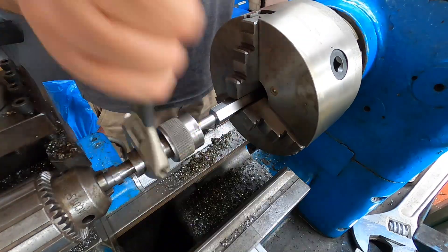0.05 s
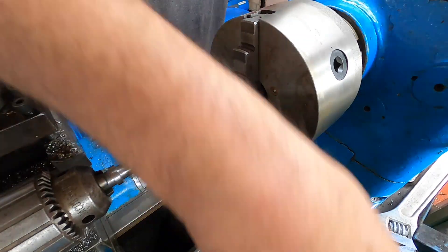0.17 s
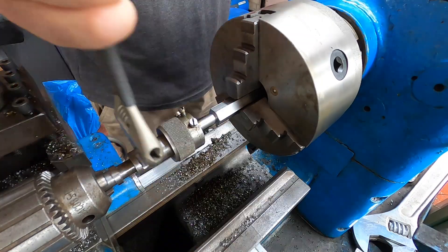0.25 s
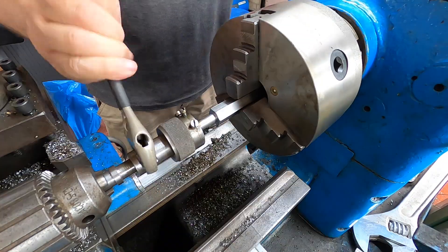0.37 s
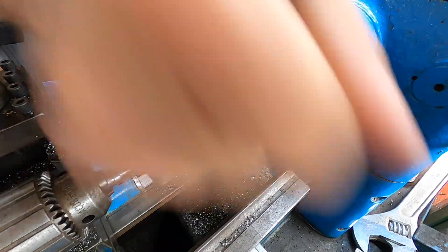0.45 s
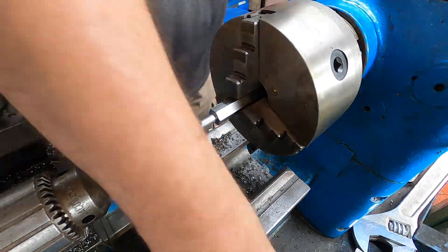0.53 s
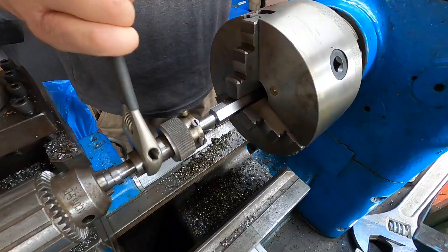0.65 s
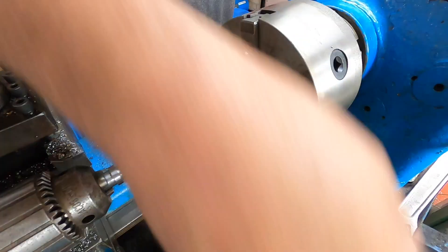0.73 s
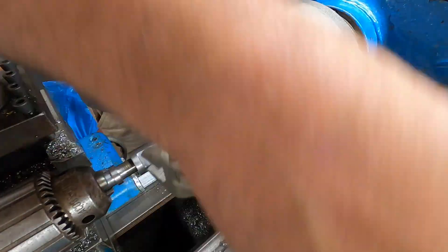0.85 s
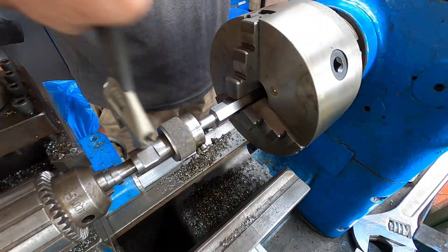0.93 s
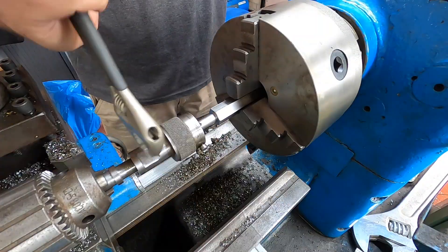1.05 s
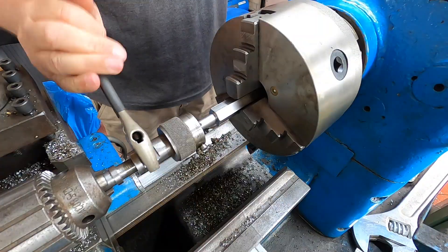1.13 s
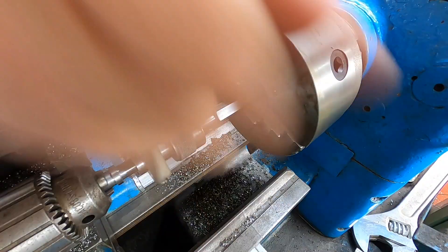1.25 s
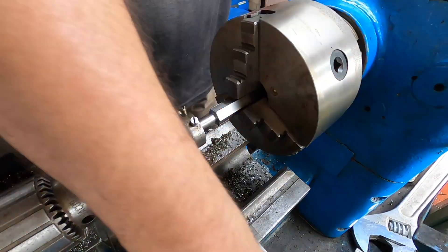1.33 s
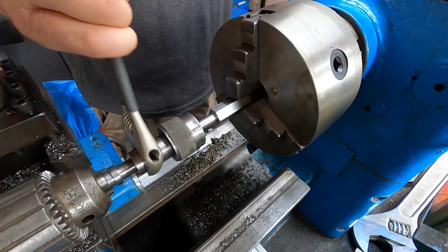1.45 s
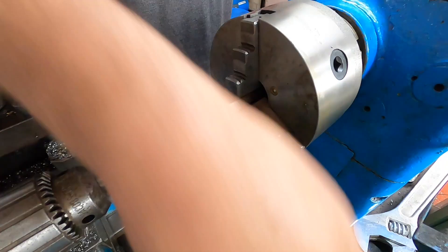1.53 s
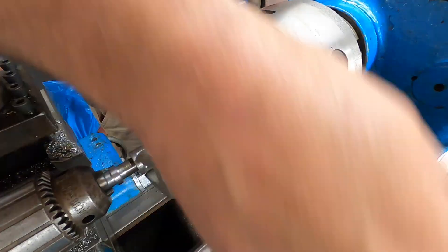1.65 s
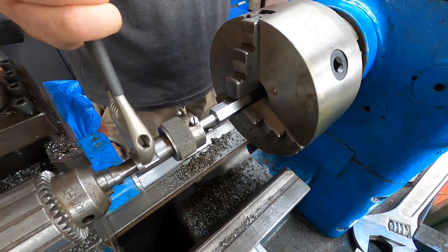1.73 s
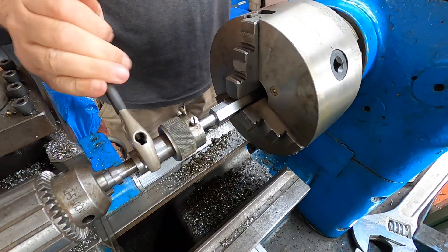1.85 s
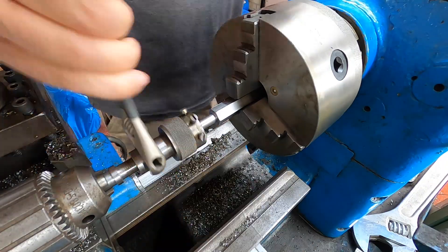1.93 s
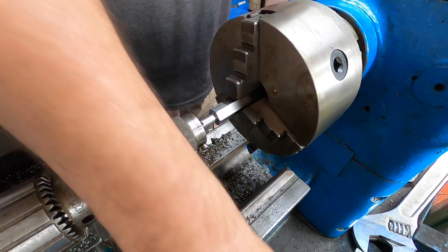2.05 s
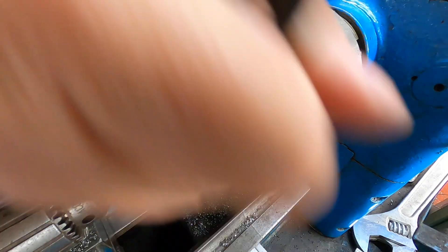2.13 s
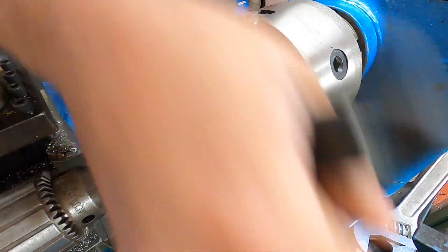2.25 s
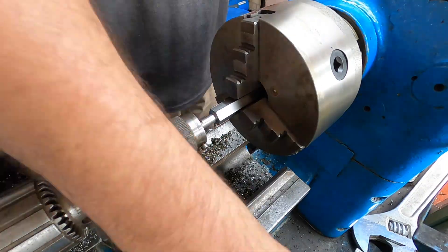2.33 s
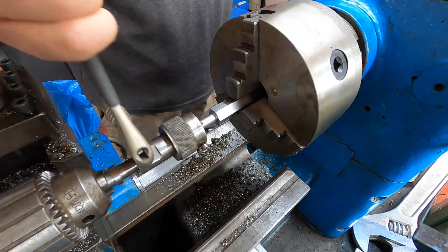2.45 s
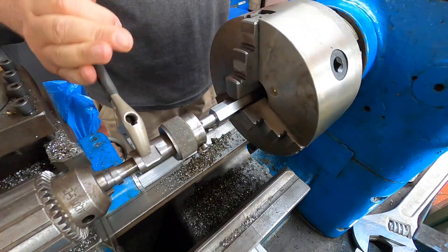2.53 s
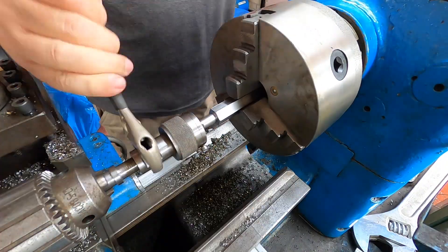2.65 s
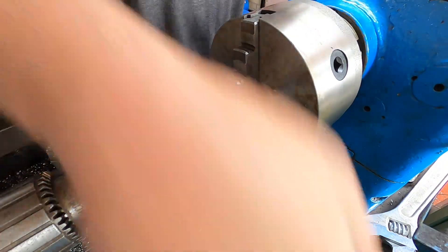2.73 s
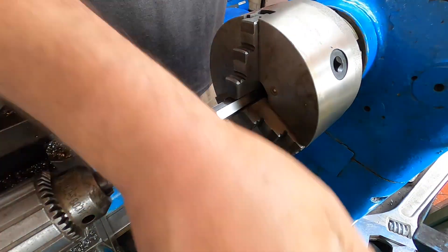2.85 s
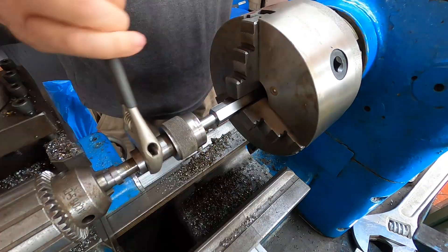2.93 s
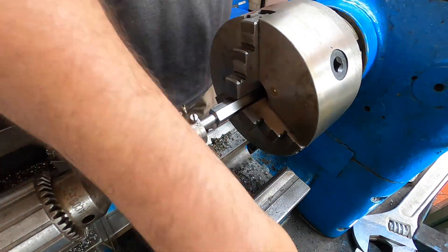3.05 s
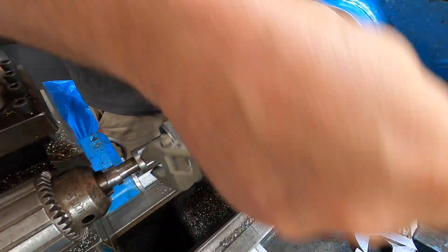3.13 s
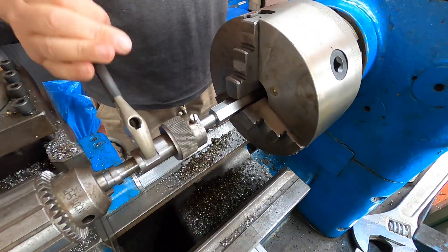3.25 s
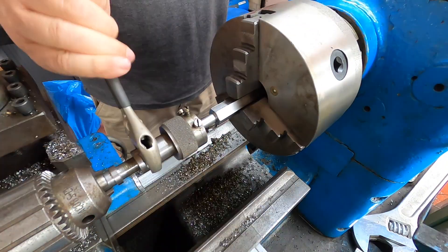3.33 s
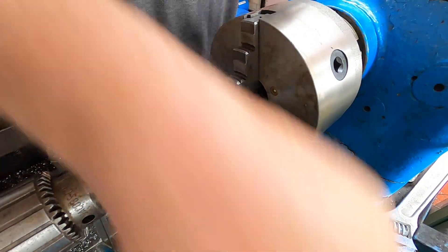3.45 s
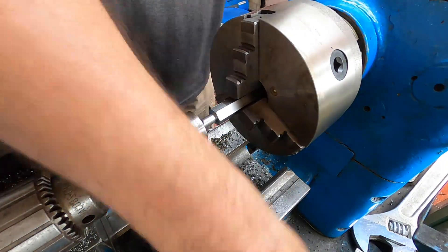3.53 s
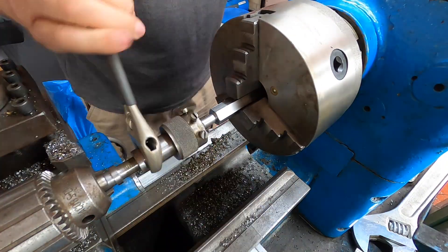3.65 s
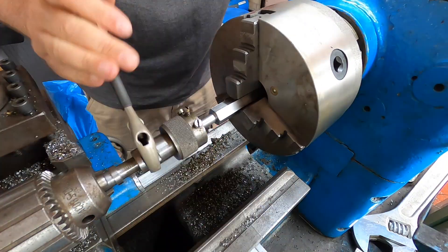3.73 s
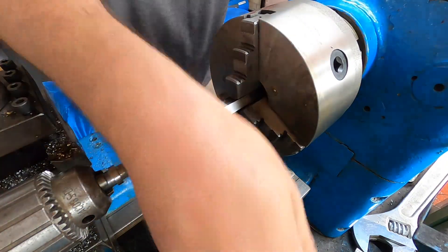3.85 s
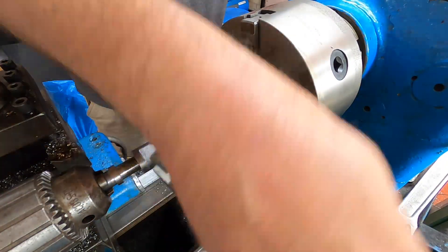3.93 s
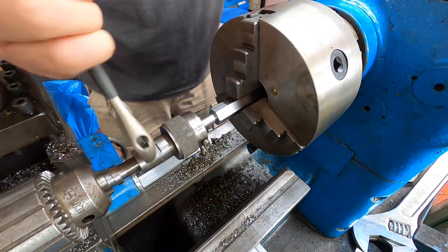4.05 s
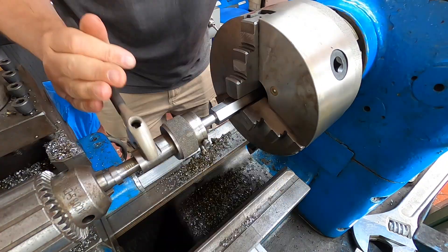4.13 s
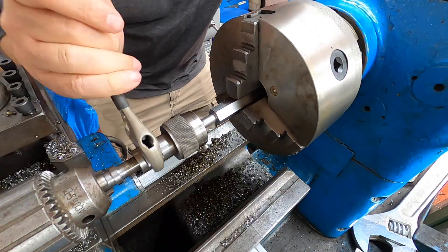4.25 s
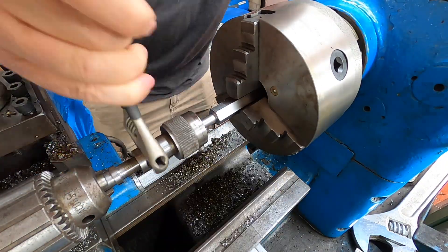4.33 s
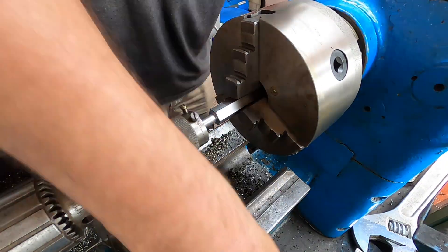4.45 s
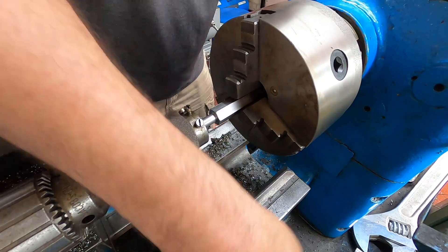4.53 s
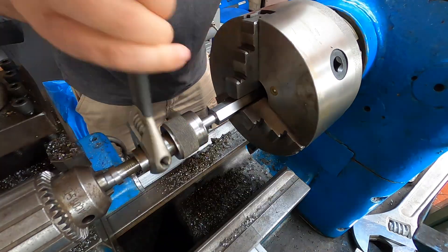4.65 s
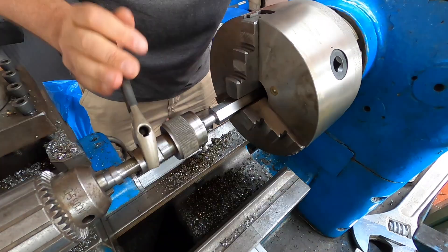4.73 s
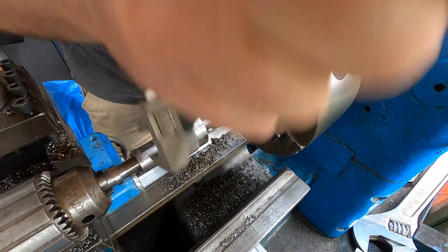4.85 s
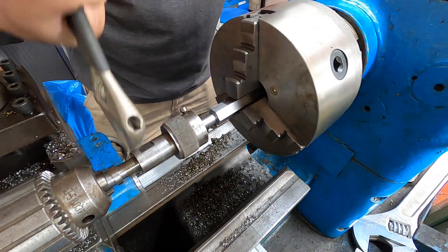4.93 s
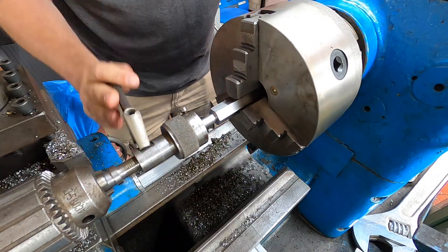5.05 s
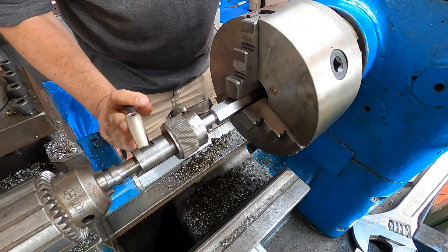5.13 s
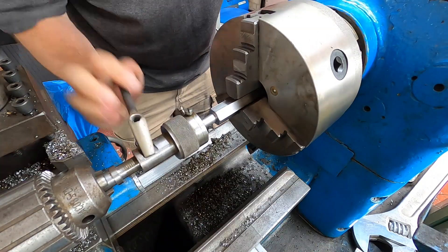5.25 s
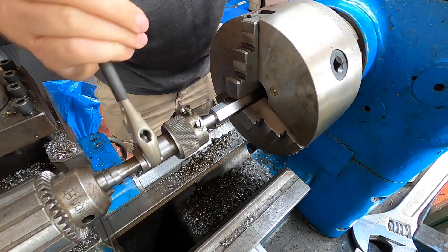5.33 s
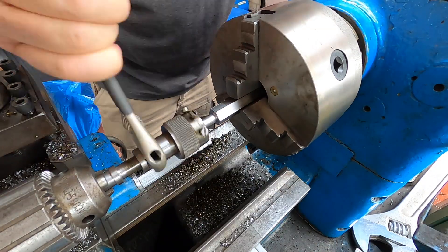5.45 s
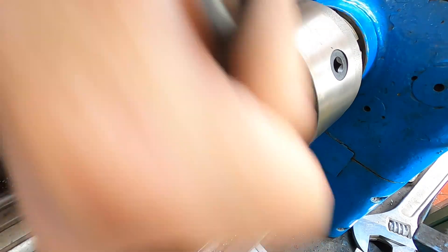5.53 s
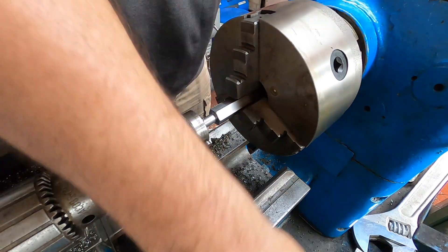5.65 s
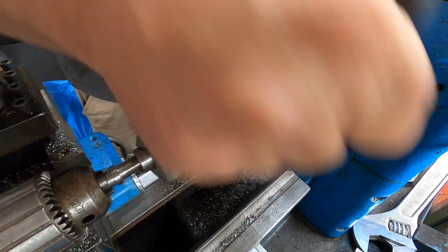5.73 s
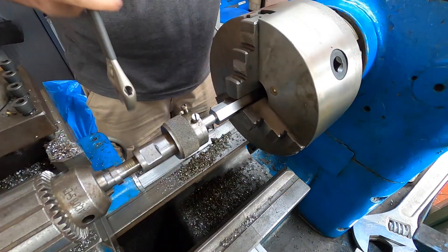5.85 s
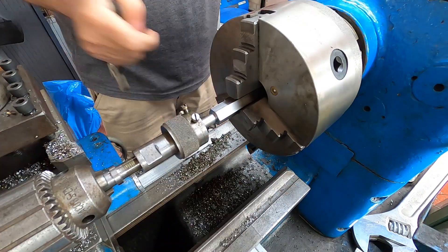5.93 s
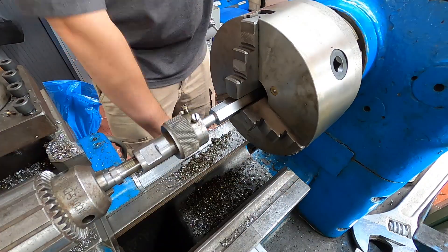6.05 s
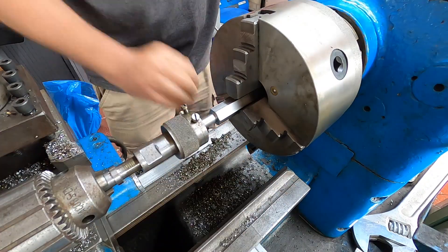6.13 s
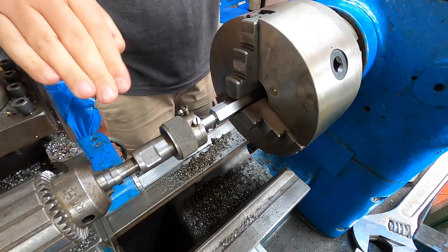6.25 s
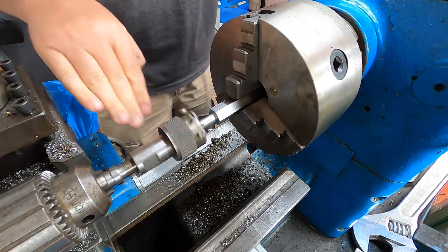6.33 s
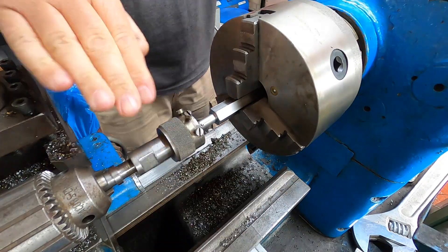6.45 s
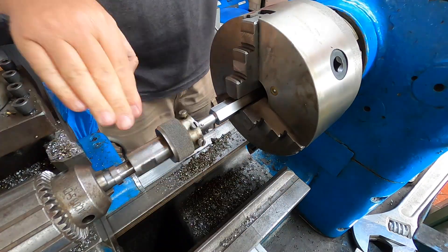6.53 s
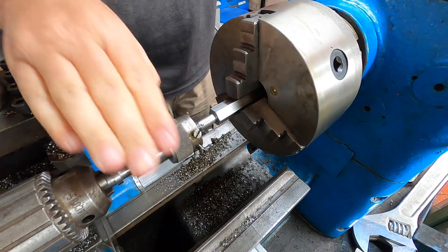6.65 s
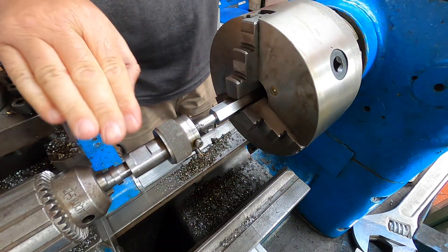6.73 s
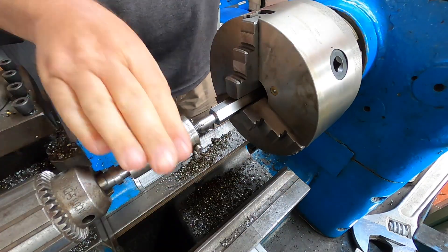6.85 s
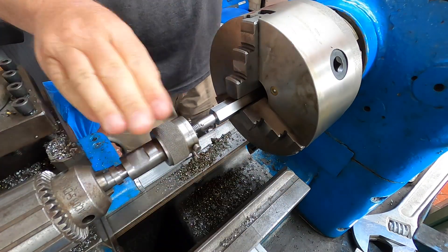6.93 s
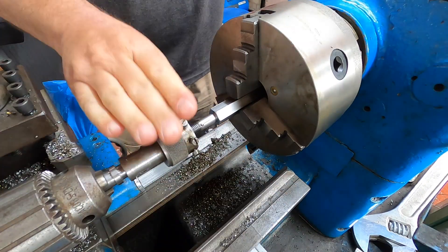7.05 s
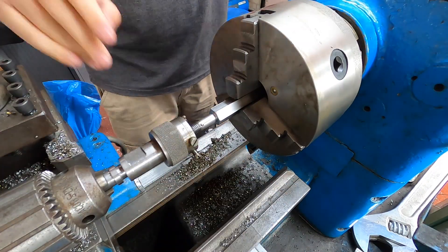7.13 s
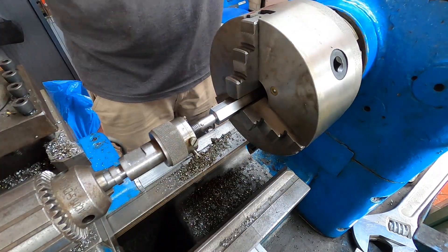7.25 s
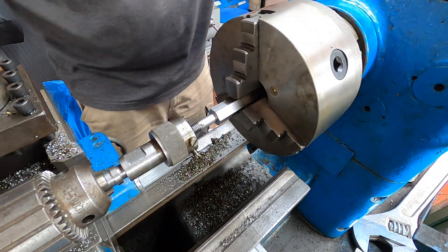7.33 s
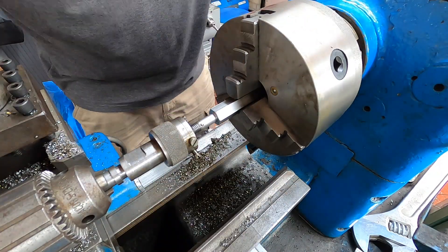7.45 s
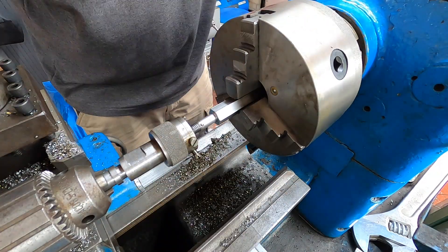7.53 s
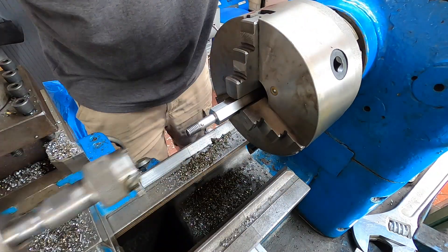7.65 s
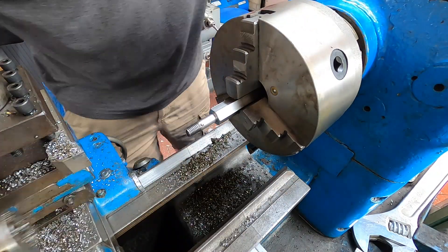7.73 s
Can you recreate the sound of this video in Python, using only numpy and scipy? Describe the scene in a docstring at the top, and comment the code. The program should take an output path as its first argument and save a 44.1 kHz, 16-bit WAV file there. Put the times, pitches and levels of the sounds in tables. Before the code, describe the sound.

Close up in a workshop, a steel bar knocks a threading die round a pin: quick uneven clusters of bright clicks, gritty metallic rattles and dull bumps. The tool work stops and a palm spins the knurled holder in soft, regular rasping swells. After a brief quiet, a lock lever thuds and the tailstock starts sliding away with a rush and faint whirr. Small stereo microphone, dry and near, faint low rumble.

```python
"""Threading die on a standing lathe

A threading die is worked round a steel pin with a short bar, close to a small stereo microphone.
Each move is a burst of grit ringing spindle, bed, tool and cutting edge; sharp steel clicks are bands
of dying noise, dull bumps are low decaying sines. Then the holder is spun off by hand in swells of fine
grit, the tailstock lock thuds in the bed modes and the tailstock slides away: grit rush and sine whirr."""
import sys
import numpy as np
from scipy import signal
from scipy.fft import rfft, irfft
from scipy.io import wavfile

SR = 44100
rng = np.random.default_rng(int(sys.argv[2]) if len(sys.argv) > 2 else 0)


def wrap_up_sound(samples):
    """Save the sound to the file named by the first command line argument, as 16-bit audio."""
    columns = np.atleast_2d(samples).T
    # keep every value between -1 and 1, then stretch to whole-number steps
    tamed = np.clip(columns, -1, 1)
    steps = np.round(tamed * 32767).astype(np.int16)
    wavfile.write(sys.argv[1], SR, steps)


N = 343098


def from_db(db):
    """Decibels to gain."""
    return 10 ** (np.asarray(db) / 20)


def rms_one(x):
    """Scaled to rms 1."""
    return x / np.sqrt(np.mean(x ** 2) + 1e-20)


def in_time(rows):
    """Columns joined by straight lines over the seconds in the first column."""
    s, *columns = np.transpose(rows)
    return [np.interp(np.arange(N) / SR, s, c) for c in columns]


def band(x, low_hz, high_hz, order=2):
    """Butterworth band-pass."""
    sos = signal.butter(order, [low_hz, high_hz], "band", fs=SR, output="sos")
    return signal.sosfilt(sos, x)


def drift(knots_per_s):
    """Slow random wander: straight lines between normal knots of spread 1."""
    knots = rng.standard_normal(int(N / SR * knots_per_s) + 2)
    return np.interp(np.arange(N) / SR * knots_per_s, np.arange(len(knots)), knots)


def grit(per_s, spread_db, size=N):
    """Small contacts at random moments, of random sign and exponentially spread level; rms 1."""
    levels_db = spread_db * np.minimum(rng.exponential(1, size), 4)
    contacts = from_db(levels_db) * rng.choice([-1, 1], size)
    happens = rng.random(size) < per_s / SR
    return rms_one(contacts * happens + 1e-9)


def body(x, modes, low_hz, high_hz, broad_db, uneven_db=0.):
    """Parallel resonances over a broad band of crowded modes; unit gain for unit white noise."""
    x = np.array([x, signal.unit_impulse(len(x))])   # the impulse gives the gain
    out = from_db(broad_db) * x
    for hz, width_hz, level_db in modes + np.outer(uneven_db, [0, 0, 1]):
        r = np.exp(-np.pi * width_hz / SR)
        poles = [1, -2 * r * np.cos(2 * np.pi * hz / SR), r * r]
        zeros = [(1 - r * r) / 2, 0, (r * r - 1) / 2]
        out = out + from_db(level_db) * signal.lfilter(zeros, poles, x)
    sound, pulse = band(out, low_hz, high_hz)
    return sound / np.linalg.norm(pulse)


def coloured(spectrum, channels=2):
    """Noise shaped by a spectrum; rms 1."""
    hz = np.fft.rfftfreq(N, 1 / SR) + 1
    point_hz, point_db = np.transpose(spectrum)
    shape = from_db(np.interp(np.log(hz), np.log(point_hz), point_db))
    noise = rng.standard_normal((channels, N))
    return rms_one(irfft(rfft(noise) * shape, N))


def add(out, s, sound):
    """Mixes a short sound in at a moment."""
    i = round(s * SR)
    out[max(i, 0):i + len(sound)] += sound[max(-i, 0):N - i]


# Modes of lathe bed, spindle and tool. Each row: frequency in Hz, width in Hz, relative level in dB.
BED = [(157.2, 27, 5), (201, 96, -9.5), (308, 33, -10.5), (392.5, 93, 0), (507, 31, -7.5)]
SPINDLE = [(1001.5, 27.6, 7.5), (1180, 180, -3.5), (1313, 150, -4.5), (1575, 55, -24.5), (1944, 690, -9)]
TOOL = [(2384, 75, 15.5), (2636, 180, 15.5), (3214, 730, 13.5), (4120, 120, 7), (4770, 1900, 11.5),
        (6180, 410, -3.5), (7540, 67, -10.5), (8300, 200, -9)]   # first five: tool body; rest: cutting edge
# Bar and holder knocking. Each row: start in seconds, t60 of the spindle part in seconds,
# spindle level in dB, bed level in dB re spindle, cutting edge level in dB re spindle.
KNOCKS = [(0.0, 0.04, -50, 13.5, -13), (0.097, 0.32, -49, 5, -11.5), (0.131, 0.11, -34, -5.5, -17.5),
          (0.222, 0.22, -38.5, -1.5, -15), (0.246, 0.059, -42, 3.5, 4.5), (0.275, 0.097, -40.5, 1.5, -5.5),
          (0.31, 0.41, -54, 7.5, -11), (0.387, 0.091, -31.5, -1.5, -7), (0.607, 0.12, -34.5, 0.5, -25),
          (0.751, 0.12, -45.5, 4, -19), (0.803, 0.062, -59, 8.5, -32), (0.881, 0.12, -39, -5.5, -12.5),
          (0.902, 0.082, -41, -2, -7), (0.952, 0.13, -36, -2, -16), (0.992, .12, -44, -23, -35),
          (1.098, 0.047, -37, -6, -5), (1.121, 0.33, -37.5, 0, -11), (1.179, 0.11, -31, -1.5, -8),
          (1.415, 0.097, -35.5, -0.5, -26), (1.548, 0.085, -39.5, -3.5, -18), (1.599, 0.06, -33, -6, -22.5),
          (1.656, 0.22, -40, -7, -20), (1.678, 0.4, -42.5, 1, -12.5), (1.73, 0.17, -44, 0, -12.5),
          (1.776, 0.062, -44, -0.5, -29.5), (1.823, 0.2, -39, -0.5, -13), (1.863, 0.081, -32, -4, -4),
          (1.903, 0.076, -44.5, -5, -7.5), (2.127, 0.086, -37, 4.5, -64), (2.191, .1, -32.5, -2.5, -1),
          (2.267, 0.24, -49.5, -0.5, -7), (2.296, 0.033, -50.5, 4, -1), (2.325, 0.21, -61.5, 11, -18),
          (2.39, 0.18, -37.5, -7.5, -11), (2.441, 0.11, -40, 0.5, -8), (2.477, .3, -46.5, 3.5, -18.5),
          (2.587, 0.28, -38, -3, -19), (2.612, .12, -34, -0.5, -8.5), (2.66, .04, -49.5, -5, -12.5),
          (2.855, 0.11, -38, -5, -38), (2.883, 0.076, -46.5, 12.5, -25), (2.96, 0.1, -61.5, 0, -14),
          (3.014, 0.23, -44, -1, -10), (3.077, 0.087, -35.5, -3, -14), (3.143, 0.53, -40, -6.5, -15),
          (3.184, 0.032, -38.5, -15, 0.5), (3.213, 0.13, -43.5, -6, 4), (3.254, 0.18, -46.5, 5, -23),
          (3.305, 0.25, -46, 3.5, -15), (3.332, .11, -33.5, 0.5, -8), (3.365, 0.042, -41, -2, -16),
          (3.589, 0.14, -36, -1, -33), (3.624, 0.022, -38.5, 1.5, -33), (3.732, 0.065, -40.5, 0, -21.5),
          (3.793, 0.18, -55, 2.5, -4), (3.849, 0.19, -67.5, 1, 4.5), (3.92, 0.078, -60, 9, -22),
          (3.979, 0.085, -40.5, -7.5, -17), (4.099, 0.086, -34, -0.5, 2.5), (4.127, 0.23, -38, -0.5, -17),
          (4.203, 0.09, -33.5, 2.5, -17), (4.235, 0.14, -52.5, 3, -12), (4.4, 0.18, -61, -16, -5.5),
          (4.592, 0.091, -39.5, -5.5, -27), (4.62, 0.097, -43.5, 8, -47), (4.744, 0.11, -49, 1, -20),
          (4.828, 0.18, -47, 4, -5.5), (4.904, .068, -37, -8, -5.5), (5.009, .064, -31.5, -2.5, -17),
          (5.058, 0.092, -39, 4.5, 2), (5.107, 0.2, -59.5, 5, -35), (5.19, 0.3, -57.5, -0.5, -24),
          (5.239, 0.087, -58, 10, -16), (5.311, 0.1, -63.5, 4, -21), (5.4, 0.071, -34.5, -1.5, -12),
          (5.425, 0.12, -39.5, 4.5, -10), (5.455, 0.08, -41.5, -4, -40), (5.712, 0.12, -37, -3, -25),
          (5.737, 0.09, -38, 5, -41), (5.842, .14, -46, 5, -7), (5.869, 0.092, -42.5, -1.5, -20),
          (6.133, 0.15, -29, -13, -5.5), (6.168, 0.093, -35.5, 1.5, -8.5), (6.188, .15, -39.5, 0.5, 3),
          (6.209, 0.028, -39.5, -6, -5), (6.286, 0.063, -44, -4, -6.5), (7.39, 0.083, -55.5, 3, 0.5),
          (7.43, 0.14, -61, -7, -9), (7.496, 0.086, -45, 3, -14.5)]
# a knock from rest swells; a weaker one hard on the heels of another is a sudden rebound
SWELL_S, REBOUND_SWELL_S, REBOUND_WITHIN_S = 0.014, 0.004, 0.047
TOOL_DB, TOOL_FOLLOWS = 3.5, 0.5   # the tool brightens along with the cutting edge
LANDING_SPREAD_DB = 5.5


def moves():
    """Each knock is a burst of grit in four parts of the steel; where it lands sets which modes answer."""
    out, t, tool_modes = np.zeros(N), np.arange(-900, 8100) / SR, np.array(TOOL)

    def burst(swell_s, t60_s):
        """Creep, swell, then exponential decay."""
        creep = from_db(-23.0 + 2700 * np.minimum(t, 0))   # the parts start to shift just before they meet
        rise = np.clip(creep + np.maximum(t, 0) / swell_s, 0, 1) ** 0.69
        return rise * from_db(-60 * np.maximum(t - swell_s, 0) / max(t60_s, 0.02))

    last_s, last_db = -1, 0
    for s, t60_s, level_db, bed_db, edge_db in KNOCKS:
        rebound = s - last_s < REBOUND_WITHIN_S and level_db < last_db
        swell_s = REBOUND_SWELL_S if rebound else SWELL_S
        last_s, last_db = s, level_db
        rattle = grit(per_s=1800, spread_db=3.8, size=len(t))
        lands_db = LANDING_SPREAD_DB * rng.standard_normal(len(tool_modes))
        spindle = body(rattle, SPINDLE, 650, 2410, broad_db=-7, uneven_db=lands_db[:5])
        bed = body(rattle, BED, 145, 650, broad_db=-12, uneven_db=lands_db[3:])
        soft_rattle = band(rattle, 630, 3000, order=1)
        tool = body(soft_rattle, tool_modes[:5], 1890, 4360, broad_db=0.5, uneven_db=lands_db[:5])
        edge = body(rattle, tool_modes[5:], 3900, 19845, broad_db=-7.0, uneven_db=lands_db[5:])
        # heavy iron answers late and rings on, small steel dies first
        parts = burst(swell_s, t60_s) * spindle
        parts += from_db(bed_db) * burst(swell_s + 0.0069, 1.146 * t60_s) * bed
        parts += from_db(TOOL_DB + TOOL_FOLLOWS * edge_db) * burst(0.81 * swell_s, 0.84 * t60_s) * tool
        parts += from_db(edge_db) * burst(swell_s, 0.62 * t60_s) * edge
        add(out, s + t[0], from_db(level_db) * parts)
    return out


# Rubbing of hands and thread, and shop rumble. Each row: time in seconds, rub level in dB, rumble level in dB.
BETWEEN = [(0, -66, -54), (.56, -71, -64), (1.29, -74.5, -67.5), (1.37, -69.5, -63), (1.97, -74, -67.5),
           (2.07, -69.5, -64), (2.72, -75, -67), (2.9, -68, -58.5), (3.5, -73, -63), (4.29, -71, -64.5),
           (4.38, -81.5, -63), (4.52, -68, -66), (4.98, -74, -68.5), (5.2, -71, -67.5), (5.4, -80, -58),
           (5.68, -71, -66.5), (6.0, -77.5, -71), (7.1, -75, -60), (7.25, -81, -64.5), (7.78, -78, -60.5)]
# Noise spectra of rub, rumble and stand sway. Each row: frequency in Hz, relative density in dB per Hz.
RUB = [(400, -35.5), (700, -18), (1000, -8), (1400, -3), (2000, -9.5), (5000, -15.5), (8500, -22.5),
       (14000, -34.5)]
RUMBLE = [(50, -28.5), (80, -12.5), (170, 3.5), (290, -3), (400, -13.5), (600, -21.5), (900, -41.5),
          (1500, -87)]
SWAY = [(8.8, -38), (15, 1), (43, 3), (86, -9), (120, -15.5), (160, -41.5), (260, -120)]
SWAY_DB = -59.5


def background():
    """Patchy rubbing, shop rumble and slow stand sway: shaped noise, the low parts mostly alike in both ears."""
    def pair(spectrum, side_db):
        """Mid noise plus opposed side noise."""
        mid, side = coloured(spectrum)
        return mid + from_db(side_db) * side * [[1], [-1]]

    rub_db, rumble_db = in_time(BETWEEN)
    rub = from_db(rub_db + 2.5 * drift(30)) * pair(RUB, side_db=-3.5)
    rumble = from_db(rumble_db + 1.4 * drift(10)) * pair(RUMBLE, side_db=-13.0)
    sway = from_db(SWAY_DB + 1.0 * drift(4)) * pair(SWAY, side_db=-15.0)
    return rub + rumble + sway


# Dull bumps felt through the stand. Each row: start in seconds, level in dB before the soft onset, pitch in Hz.
BUMPS = [(0.02, -39.5, 78.5), (0.317, -42, 32.3), (0.615, -42, 37.7), (0.658, -36, 89), (1.427, -37, 78.5),
         (1.469, -29.5, 49.3), (1.659, -44, 39.2), (2.121, -39, 59), (2.179, -36, 33), (2.866, -37, 83.4),
         (2.92, -36, 61.6), (3.598, -38, 70), (4.606, -45, 97), (5.399, -43, 107.4), (5.735, -34.5, 80.4),
         (6.152, -35, 74), (7.389, -25, 49.8), (7.51, -28.5, 111)]
BUMP_T60_S, BUMP_ONSET_S = 0.13, 0.004


def bumps():
    """A soft push sets the stand swinging: a decaying sine."""
    out, t = np.zeros(N), np.arange(11025) / SR
    for s, level_db, hz in BUMPS:
        onset = 1 - np.exp(-t / BUMP_ONSET_S)
        decay = from_db(level_db - 60 * t / BUMP_T60_S)
        add(out, s, decay * onset * np.sin(2 * np.pi * hz * t))
    return out


# Steel on steel. Each row: start in seconds, peak level in dB, ring frequency in Hz.
CLICKS = [(0.118, -30, 4500), (0.134, -29, 2980), (0.2318, -25, 2220), (0.2484, -31, 3000),
          (0.2862, -28, 2820), (0.398, -16, 4520), (0.613, -37, 3270), (0.627, -42, 2000),
          (0.9066, -34, 2650), (0.964, -18.5, 2750), (1.0277, -44.5, 7740), (1.1032, -22, 6800),
          (1.1143, -16.5, 3900), (1.1242, -19.5, 3150), (1.165, -36, 3830), (1.197, -21.5, 3700),
          (1.413, -36, 2010), (1.431, -39, 3030), (1.5496, -32, 3560), (1.573, -40, 4500),
          (1.605, -25, 3020), (1.685, -34, 3400), (1.703, -29, 3030), (1.751, -42, 4500),
          (1.823, -32, 2490), (1.84, -22.5, 2450), (1.8738, -18.5, 3570), (2.123, -46, 1900),
          (2.139, -51, 1870), (2.1935, -27, 2800), (2.2702, -36, 2580), (2.4065, -30.5, 5360),
          (2.446, -27, 3170), (2.5983, -24, 3600), (2.6124, -21, 5300), (2.6281, -14.5, 3620),
          (2.858, -57, 1880), (2.869, -53, 1950), (3.034, -28.5, 2780), (3.076, -32.5, 3270),
          (3.094, -28.5, 3380), (3.1892, -28, 3620), (3.3115, -40.5, 3610), (3.331, -25, 3630),
          (3.481, -54, 3390), (3.592, -45, 1900), (3.615, -47, 2500), (3.7362, -35, 2600),
          (3.804, -42, 2620), (3.845, -45, 3230), (4.0805, -39, 5000), (4.1085, -24, 4570),
          (4.1332, -31, 2650), (4.2155, -20.5, 4420), (4.552, -51, 1700), (4.61, -35.5, 1890),
          (4.9088, -32, 2560), (5.017, -24.5, 2370), (5.4146, -14, 5050), (5.4657, -44, 2630),
          (5.5396, -58, 5460), (5.7224, -38, 3600), (5.853, -42, 2600), (5.954, -60, 4500),
          (6.139, -19, 2600), (6.196, -23, 2980), (6.2951, -28, 2920), (7.512, -38, 1520)]
CLICK_T60_S, CRACK_T60_S, CRACK_DB = 0.025, 0.003, 4   # the first instant stands out over the ring
SPIT_DB = -23.5


def clicks():
    """A crack of noise ringing briefly at its own pitch, with a broad spit on top."""
    out, t = np.zeros(N), np.arange(1323) / SR
    decay = from_db(-60 * t / CLICK_T60_S) + from_db(CRACK_DB - 60 * t / CRACK_T60_S)
    for s, peak_db, hz in CLICKS:
        dying = rng.standard_normal(len(t)) * decay
        ring = band(dying, hz * 0.82, hz * 1.27, order=1)
        spit = from_db(SPIT_DB) * band(dying, 1700, 19845, order=1)
        click = ring + spit
        add(out, s, from_db(peak_db) * click / np.abs(click).max())
    return out


# Modes of the holder. Each row: frequency in Hz, width in Hz, relative level in dB.
HOLDER = [(1022, 67, 8.5), (1260, 380, -3.5), (2540, 1300, -4), (3600, 115, 8.5), (5000, 260, -6),
          (6270, 200, -29)]
# Palm strokes on the knurled holder. Each row: time in seconds, peak level of the swell in dB.
SPINS = [(6.388, -49.5), (6.482, -47), (6.577, -48), (6.67, -49), (6.764, -48.5), (6.858, -49),
         (6.948, -50), (7.036, -52.5), (7.143, -50.5)]
SPIN_FALL_S, SPIN_BED_DB = 0.048, -2.5   # time from peak to 82 dB down (bed: 32 dB); bed re holder
# loose on the last threads, it rasps on between strokes
COAST_FROM_S, COAST_DB, COAST_RISE_DB_PER_S = 6.99, -69.5, 35


def spins():
    """The knurl runs under the palm: a swell of fine grit in the holder, the bed answering first."""
    swell, push, t = np.zeros(N), np.zeros(N), np.arange(6000) / SR
    for s, peak_db in SPINS:
        holder_fall_db = 82 * np.abs((t - 0.055) / SPIN_FALL_S) ** 2.19
        bed_fall_db = 32 * np.abs((t - 0.05) / SPIN_FALL_S) ** 1.7
        add(swell, s - 0.04, from_db(peak_db - holder_fall_db))
        add(push, s - 0.04, from_db(peak_db + SPIN_BED_DB - bed_fall_db))
    coast_s = np.arange(COAST_FROM_S, SPINS[-1][0] + 0.017, 1 / SR) - COAST_FROM_S
    add(swell, COAST_FROM_S, from_db(COAST_DB + COAST_RISE_DB_PER_S * coast_s))
    knurl = grit(per_s=2200.0, spread_db=1.0)
    rasp = body(band(knurl, 500, 3500, order=1), HOLDER, 600, 15000, broad_db=-9)
    return swell * rasp + push * body(knurl, BED, 98, 530, broad_db=-7)


# Lock lever blows on the bed. Each row: start in seconds, blow level in dB before the bed's response.
THUDS = [(7.141, -35), (7.396, -36.5), (7.493, -37), (7.504, -24.5), (7.514, -20.5)]


def thuds():
    """Soft blows of a few milliseconds ring only the lowest modes of the bed."""
    blows = np.zeros(N)
    for s, blow_db in THUDS:
        add(blows, s, from_db(blow_db) * np.hanning(140))
    return from_db(-12.0) * body(blows + 1e-12, BED[:3], 127, 335, broad_db=-17.5)


# Modes of tailstock on ways. Each row: frequency in Hz, width in Hz, relative level in dB.
WAYS = [(316, 29, -0.5), (479, 29, -0.5), (1055, 270, -10), (1930, 650, -16), (2850, 120, -3.5),
        (3580, 26, -16), (3700, 31, -1), (4100, 110, -18)]
# Tailstock sliding. Each row: time in seconds, rush level in dB, whirr pitch in Hz, whirr level in dB.
SLIDE = [(7.63, -91, 482, -78), (7.664, -46.5, 462, -75), (7.73, -44, 458, -47), (7.78, -45.5, 517, -53)]


def slide():
    """Iron rushing on the ways as dense grit in their modes, with a sine whirr of wavering level."""
    rush_db, hz, whirr_db = in_time(SLIDE)
    fade_in = np.clip((np.arange(N) / SR - SLIDE[0][0]) / 0.01, 0, 1)
    rush = body(grit(per_s=8000.0, spread_db=-5.0), WAYS, 150, 2950, broad_db=-9.5)
    tone = np.sqrt(2) * np.sin(2 * np.pi * np.cumsum(hz) / SR)
    whirr = tone * from_db(1.2 * drift(40))
    return fade_in * (from_db(rush_db) * rush + from_db(whirr_db) * whirr)


NEAR_T60_S, NEAR_DB, NEAR_CUT_HZ = 0.038, -6.5, 1450


def nearby(x):
    """Dense short reflections off chuck, tray and hands, opposite in the two channels, changing as hands move."""
    t, echo = np.arange(4000) / SR, 0
    thin = band(x, NEAR_CUT_HZ, 14000, order=1)
    for noise in rng.standard_normal((3, len(t))):
        tail = noise * from_db(-60 * t / NEAR_T60_S)
        echo = echo + signal.fftconvolve(thin * drift(5.6), tail / np.linalg.norm(tail))[:N]
    return from_db(NEAR_DB) * echo * [[1], [-1]]


LEFT_DB, LEFT_LAG_S = 0.65, 2.5e-5   # at low frequencies


def scene():
    """The lathe reaches the left port a little later and louder; the housing shades its top treble."""
    lathe = moves() + bumps() + clicks() + spins() + thuds() + slide()
    hz = np.fft.rfftfreq(N, 1 / SR)
    lag_s = LEFT_LAG_S * np.exp(-(hz / 7000) ** 2)   # short waves come straight in at both ports
    shade_db = 4.5 * (hz / 12000) ** 4
    left_response = from_db(LEFT_DB - shade_db) * np.exp(-2j * np.pi * hz * lag_s)
    left = irfft(rfft(lathe) * left_response, N)
    return np.array([left, lathe]) + nearby(lathe) + background()


MIC_TOP_HZ, CUTOFF_HZ = 9160, 15700


def record(dry):
    """The housed microphones fall away above their port resonance; the top is cut."""
    heard = signal.sosfilt(signal.cheby1(3, 1.2, MIC_TOP_HZ, fs=SR, output="sos"), dry)
    return signal.sosfilt(signal.ellip(10, 0.5, 70, CUTOFF_HZ, fs=SR, output="sos"), heard)


dry = scene()
out = record(dry)
wrap_up_sound(out)
```